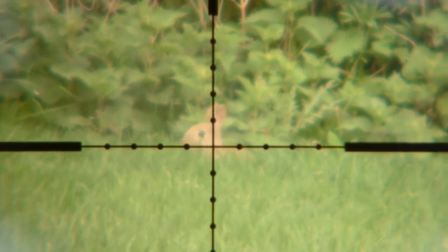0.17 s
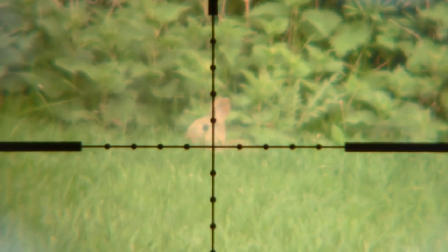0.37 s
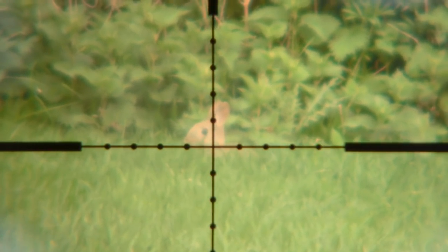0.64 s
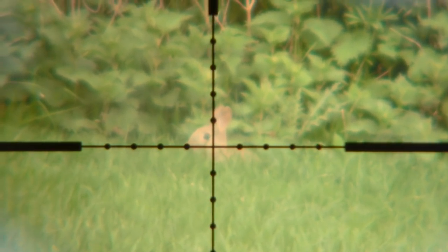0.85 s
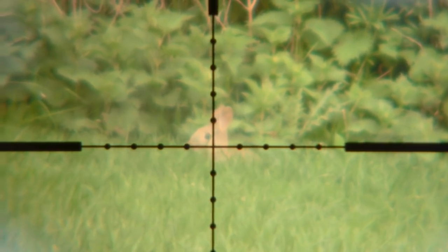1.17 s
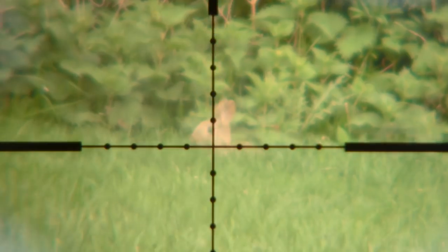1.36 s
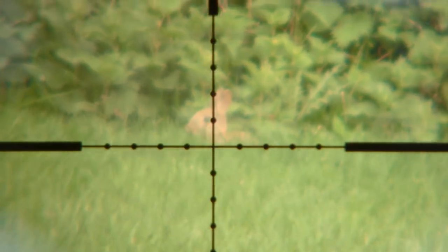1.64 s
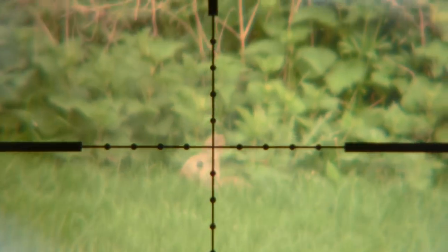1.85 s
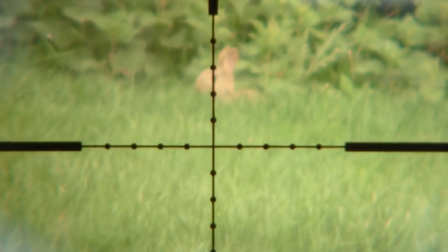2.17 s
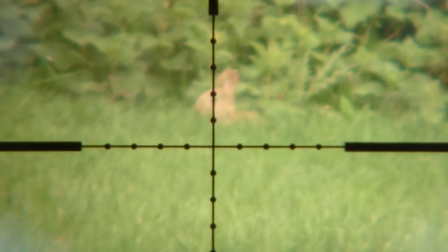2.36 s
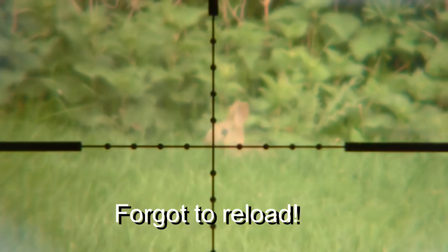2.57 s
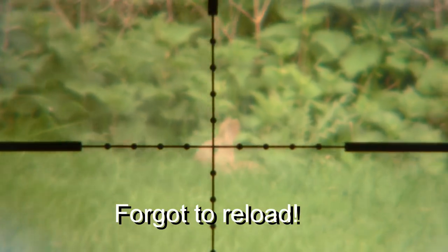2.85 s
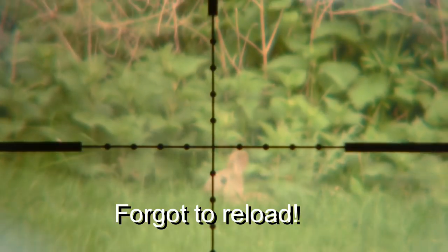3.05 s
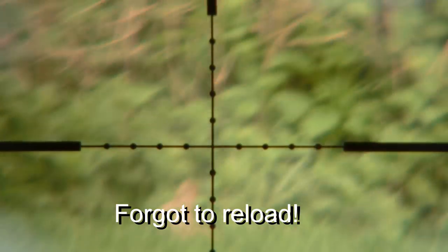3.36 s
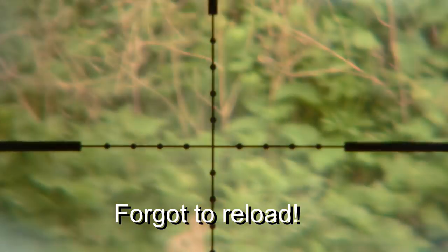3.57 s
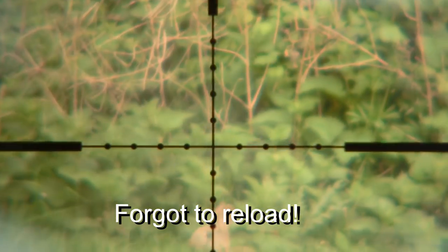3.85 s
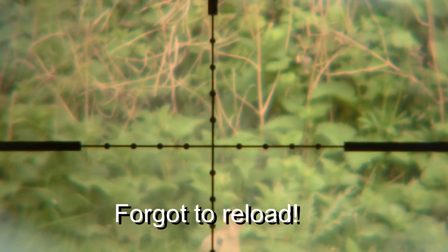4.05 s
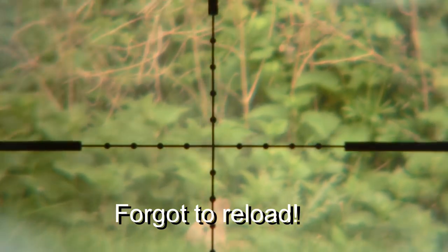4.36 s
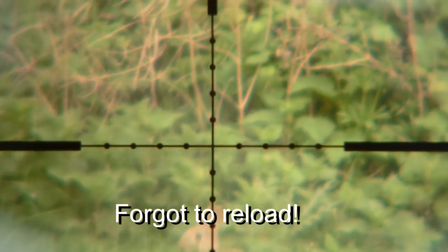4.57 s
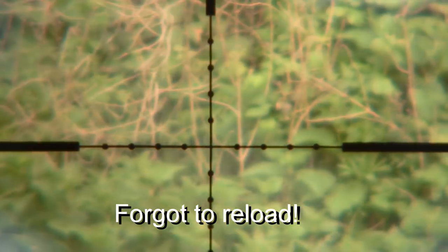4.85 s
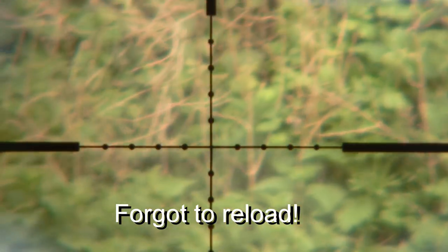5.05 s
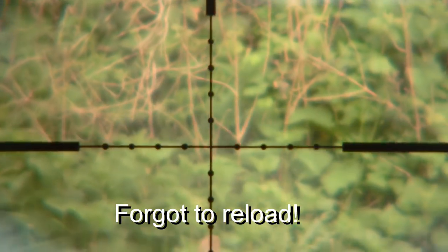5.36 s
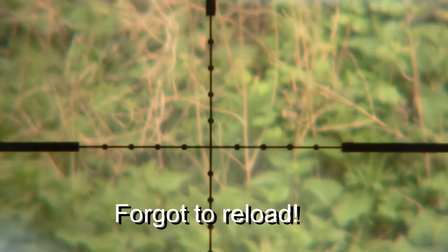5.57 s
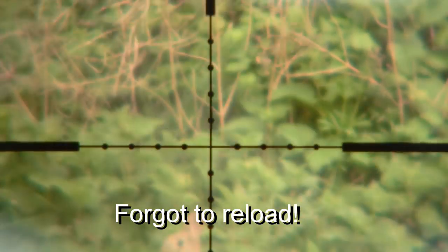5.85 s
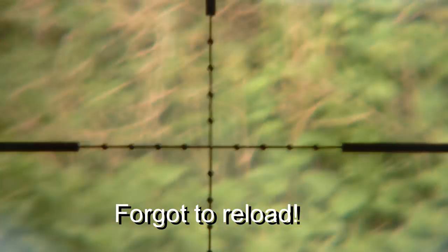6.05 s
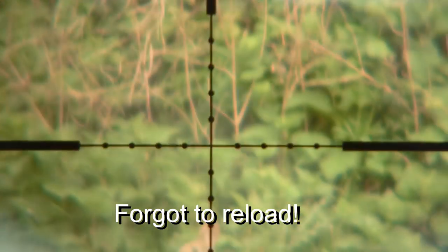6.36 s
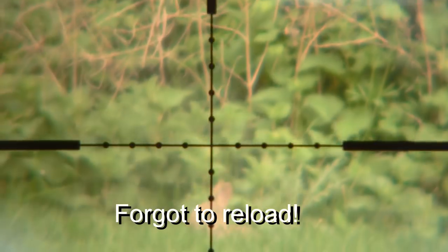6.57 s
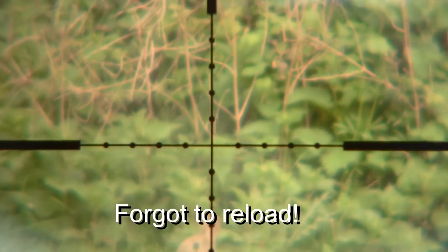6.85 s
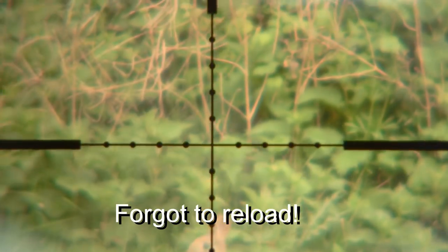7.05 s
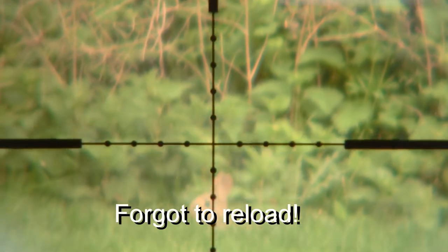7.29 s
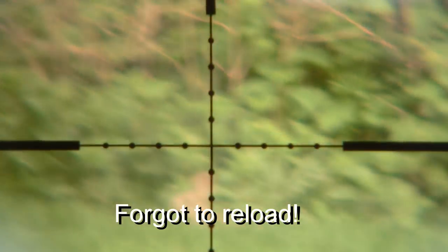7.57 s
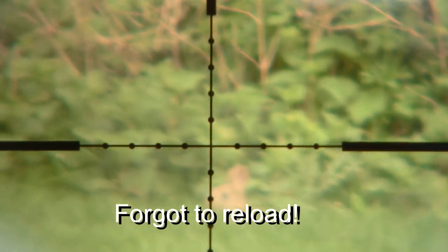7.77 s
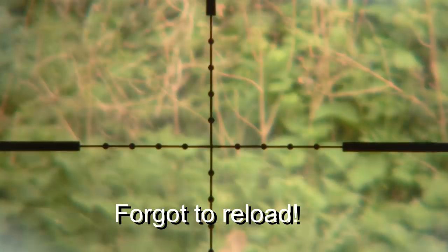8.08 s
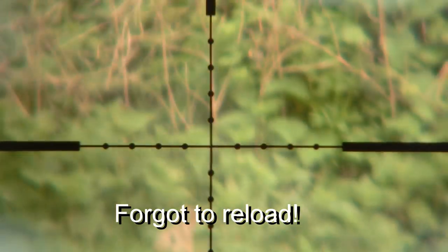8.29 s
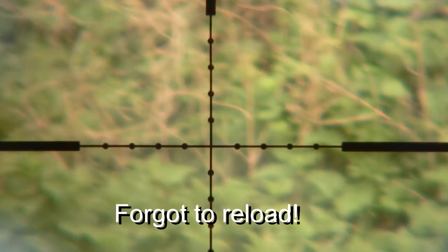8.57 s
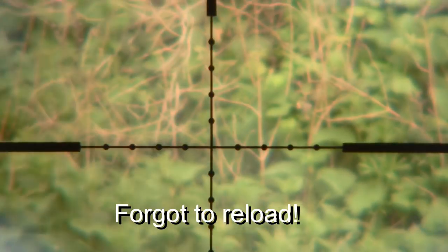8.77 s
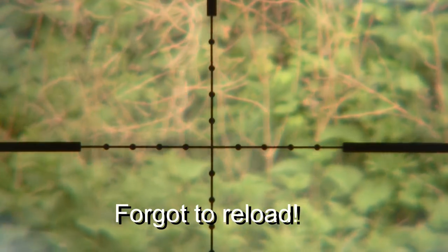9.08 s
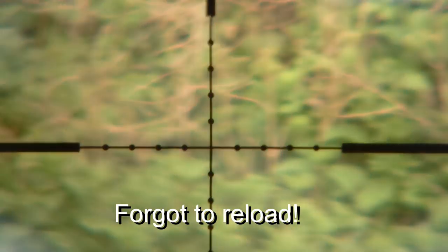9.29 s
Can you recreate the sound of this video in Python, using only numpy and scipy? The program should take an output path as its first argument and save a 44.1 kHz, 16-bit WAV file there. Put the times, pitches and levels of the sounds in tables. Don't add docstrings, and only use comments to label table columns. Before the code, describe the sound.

A microphone clamped to a rifle picks up close, hard metal sounds outdoors. Birds chirp and warble over faint traffic and hiss; light taps and a soft scrape lead to a solid clack, then a piercing snap, after which the background briefly dips. Clusters of clunks, scrapes, ticks and a tiny high spring ring follow, then rattling taps as a magazine is seated and a last double knock. Leaves return faint echoes of the birds.

```python
import sys
import numpy as np
from scipy import signal
from scipy.fft import rfft, irfft
from scipy.io import wavfile
from scipy.ndimage import uniform_filter1d

SR = 44100
rng = np.random.default_rng(int(sys.argv[2]) if len(sys.argv) > 2 else 0)


def wav_record(signal):
    frames = np.transpose(np.atleast_2d(signal))
    bounded = np.clip(frames, -1, 1)
    quanta = np.round(bounded * 32767).astype(np.int16)
    wavfile.write(sys.argv[1], SR, quanta)


def natural_amplitude(level_db):
    exponent = np.asarray(level_db, float) / 20
    return 10 ** exponent


N = 415422


def evened(x):
    return x / np.sqrt(np.mean(x ** 2) + 1e-20)


def read(points, hz):
    f, value = np.transpose(points)
    return np.interp(np.log(hz + 1), np.log(f + 1), value)


def add(mix, s, sound):
    part = mix[..., max(round(s * SR), 0):][..., :sound.shape[-1]]
    part += sound[..., :part.shape[-1]]


def noise(colour, same, patchy_db, size=1024):
    frames, hz = 4 * N // size + 5, np.fft.rfftfreq(size, 1 / SR)
    a, b, c, d, patches = rng.standard_normal((frames, len(hz), 5)).T
    patches = uniform_filter1d(patches, size=8, axis=0)
    patches = evened(uniform_filter1d(patches, size=12288 // size, axis=1))
    same = np.clip(same(hz), 0, 1)[:, None]
    left = a + 1j * b
    right = same * left + np.sqrt(1 - same ** 2) * (c + 1j * d)
    z = np.array([left, right]) * natural_amplitude(read(colour, hz)[:, None] + patchy_db * patches)
    return evened(signal.istft(z, nperseg=size, noverlap=3 * size // 4)[1][:, :N])


def road():
    # time in seconds, level in dB.
    roar_level = [(0.0, -58), (0.94, -55.5), (4.67, -56.5), (4.77, -54.5), (6.06, -56.5), (6.22, -52.5),
                  (7.26, -54.5), (8.58, -47.5), (9.42, -50.5)]
    # time in seconds, level in dB.
    rumble_level = [(0.0, -62), (1.05, -59.5), (4.67, -58), (5.17, -59.5), (5.61, -57), (6.85, -58),
                    (7.16, -59), (9.24, -59), (9.42, -56)]
    # frequency in Hz, density in dB per Hz.
    roar_colour = [(300, -23.5), (440, -9), (634, -0.5), (863, 2), (1180, -13.5), (1650, -25), (2600, -39),
                   (4000, -70)]
    rumble_colour = [(12, -26), (20, -8), (45, -4), (58, 1.5), (70, 5.5), (82, -6), (110, -8.5),
                     (265, -14.5), (420, -10), (600, -42)]
    # frequency in Hz, likeness from 0 to 1.
    far_likeness = [(60, 0.92), (130, 0.28), (290, 0.54), (640, 1), (1410, 0.96), (3100, 0.46)]

    def same(hz):
        return read(far_likeness, hz)

    t = np.arange(N) / SR
    roar_db = np.interp(t, *np.transpose(roar_level)) + 0.77
    roar = natural_amplitude(roar_db) * noise(roar_colour, same, 0.5)
    rumble_db = np.interp(t, *np.transpose(rumble_level)) + 2.0
    rumble = natural_amplitude(rumble_db) * noise(rumble_colour, same, 0.54, size=4096)
    return roar + rumble


def hiss():
    # frequency in Hz, density in dB per Hz.
    hiss_colour = [(300, 3.5), (1650, 2.5), (3620, -1.5), (5210, -3.5), (15500, -7.5)]
    return natural_amplitude(-61.5) * noise(hiss_colour, lambda hz: 300 / (hz + 300), 0.7)


def far_birds():
    # start in seconds, length in seconds, Hz at start, Hz at end,
    # level in dB.
    sweeps = [
        (0.25, 0.036, 4400, 6400, -71),
        (.385, 0.079, 4210, 4100, -63.5),
        (0.466, 0.04, 5370, 7200, -76),
        (2.648, 0.034, 4760, 5200, -61),
        (3.249, 0.043, 3500, 2940, -65),
        (4.106, 0.032, 2290, 5800, -59.5),
        (6.86, 0.022, 3630, 4500, -61.5),
        (9.408, 0.028, 4320, 4800, -51),
    ]
    # start in seconds, length in seconds, Hz at start, Hz at end, level in dB.
    whistles = [
        (1.02, .22, 2150, 2750, -65),
        (3.94, .32, 2370, 2250, -66),
        (5.335, .14, 2280, 2270, -60),
        (5.94, .1, 2350, 2450, -73),
        (6.41, .14, 2010, 1940, -72),
        (6.31, .18, 6030, 5970, -73),
        (6.78, .13, 5060, 5200, -68),
        (7.41, .1, 7140, 7140, -73),
    ]
    out = np.zeros(N)
    for s, length, start_hz, end_hz, db in whistles + sweeps:
        wobble = evened(uniform_filter1d(rng.standard_normal(16384), size=400))[:round(length * SR)]
        pitch = np.linspace(start_hz, end_hz, len(wobble)) + 25 * wobble
        level = natural_amplitude(db - 5 + 1.5 * wobble[::-1]) * signal.windows.tukey(len(pitch), .4)
        add(out, s, level * np.sin(2 * np.pi * np.cumsum(pitch) / SR))
    return out


def sparrows():
    # share of the call's length, pitch as share of its top, level in dB.
    zigzag = [(0, .82, -6), (.14, 1, 0), (.32, .74, -2), (.44, .66, -18), (.56, .64, -5), (.78, .8, 0),
              (.88, .68, -1), (1, .68, -6)]
    shoulder = [(0, .62, -2.5), (.17, 0.96, -0.5), (.26, .79, -1.5), (.42, .78, -1), (.47, .63, -8),
                (.62, 0.72, -4), (.8, .7, -11.5), (1, .59, -7)]
    stairs = [(0, .83, 3), (.15, 0.99, 1.5), (.4, 0.99, -7.5), (.46, .84, -1.5), (.64, 0.8, -15),
              (.7, .7, -8), (.8, .75, -2), (1, .64, -8)]
    # start in seconds, length in seconds, top pitch in Hz, level in dB.
    zigzag_calls = [(0.673, 0.078, 4920, -68), (1.733, 0.1, 4320, -65.5), (3.56, 0.115, 4450, -61.5),
                    (5.07, 0.105, 4400, -63.5), (6.383, 0.098, 4566, -62), (7.016, 0.065, 5320, -63.5)]
    shoulder_calls = [(.28, 0.12, 5350, -54.5), (.495, 0.11, 5350, -56.5), (1.514, 0.11, 5206, -51.5),
                      (2.69, 0.12, 5370, -59.5), (4.336, 0.11, 5240, -55.5)]
    stairs_calls = [(1.158, 0.094, 4500, -59.5), (1.903, 0.094, 4446, -61.5), (3.495, 0.072, 4500, -61),
                    (5.234, .095, 4520, -59), (8.965, 0.1, 4570, -60.5)]
    out = np.zeros(N)
    for shape, calls in [(zigzag, zigzag_calls), (shoulder, shoulder_calls), (stairs, stairs_calls)]:
        at, share, shape_db = np.transpose(shape)
        for s, length, top_hz, call_db in calls:
            u = np.linspace(0, 1, round(length * SR))
            chance = rng.standard_normal((3, 8192))
            wobble, rasp, flutter = (evened(uniform_filter1d(c, size=k))[:len(u)]
                                     for c, k in zip(chance, (120, 16, 400)))
            pitch = top_hz * (uniform_filter1d(np.interp(u, at, share), size=90) + 0.02 * wobble)
            level = natural_amplitude(call_db + np.interp(u, at, shape_db) + 3.5 * flutter)
            level = level * (1 + 0.45 * rasp) * signal.windows.tukey(len(u), .15)
            add(out, s, level * np.sin(2 * np.pi * np.cumsum(pitch) / SR))
    return out


def bounced(x):
    # delay in seconds, level in dB.
    bounces = [(.011, -12), (.023, -11), (.041, -13), (.067, -17)]
    out = x.copy()
    for s, db in bounces:
        add(out, s, natural_amplitude(db) * x)
    return natural_amplitude(-1.2) * out


def hedge(x):
    # frequency in Hz, time to fall 60 dB in seconds.
    decay = [(300, 0.56), (2000, 0.17), (4000, .36), (6000, 0.31), (12000, 0.064)]
    taps = np.zeros((2, 16000))
    at = np.arange(200, 15980, 20) + rng.integers(0, 20, (2, 789))
    np.put_along_axis(taps, at, rng.choice([-1., 1.], at.shape), 1)
    hz, t, z = signal.stft(taps, SR, nperseg=256)
    t60 = np.maximum(read(decay, hz), .02)[:, None]
    tail = signal.istft(z * natural_amplitude(-60 * t / t60), SR, nperseg=256)[1]
    return signal.fftconvolve(x[None], tail / np.linalg.norm(tail[0]), axes=1)[:, :N]


def ring(modes, drive, landing_db, chance):
    t = np.arange(4096) / SR
    hz, width, db = np.transpose(modes)[:, :, None]
    share = natural_amplitude(db + landing_db(hz[:, 0])[:, None]) * np.sign(chance[:len(hz), None])
    share = share / abs(np.exp(-2j * np.pi * hz * t[:len(drive)]) @ drive)[:, None] ** 0.9
    body = (share * np.exp(-np.pi * width * t) * np.cos(2 * np.pi * hz * t)).sum(0)
    out = signal.fftconvolve(drive, body)[:4096]
    return out / abs(out).max()


def crack(drive, lo_hz, hi_hz):
    band = signal.butter(2, [lo_hz, min(hi_hz, 20000)], "band", fs=SR, output="sos")
    out = signal.sosfilt(band, np.pad(drive, (0, 3072)))
    return out / abs(out).max()


def all_knocks():
    # start in seconds, stock peak in dB, action peak in dB, stock tone in Hz.
    taps = [(1.152, -34, -39.5, 730), (2.4415, -37, -39.5, 640), (2.457, -31, -38, 564),
            (2.47, -32, -46, 540), (3.4136, -41.5, -46.5, 650), (5.0908, -38.5, -38.5, 760),
            (5.726, -36.5, -37, 604), (5.8107, -37.5, -38, 496), (6.0566, -31.5, -32.5, 803),
            (6.0649, -24.5, -31.5, 586), (6.135, -36, -26, 580), (6.182, -35.5, -30.5, 560),
            (6.271, -35, -47, 573), (7.438, -40, -42.5, 670), (7.5824, -30, -42.5, 674),
            (7.6091, -23.5, -30.5, 778), (7.6939, -29, -28.5, 606), (7.9144, -25.5, -30.5, 643),
            (7.927, -31, -25.5, 704), (7.9943, -32, -34, 710), (8.021, -33.5, -38.5, 484),
            (8.2044, -32.5, -44, 647), (8.2577, -26.5, -32.5, 736), (8.273, -31, -33, 800),
            (8.327, -25, -33.5, 520), (8.423, -29.5, -31, 900), (8.431, -31.5, -38, 654),
            (8.4957, -28.5, -31.5, 580), (8.5539, -27.5, -30.5, 635), (8.766, -33.5, -43.5, 665)]
    # start in seconds, stock peak in dB, stock tone in Hz.
    thuds = [(1.264, -37.5, 393), (1.288, -35.5, 410), (1.29, -44, 387), (3.3645, -35, 544),
             (5.022, -38, 502), (5.1754, -27, 568), (6.346, -36.5, 657), (6.509, -33.5, 560),
             (7.466, -30, 618), (7.533, -35, 537), (7.794, -38, 527), (8.123, -36, 584), (8.349, -36, 770),
             (8.469, -24, 590), (8.477, -29, 665)]
    # start in seconds, action peak in dB, steel peak in dB.
    ticks = [
        (1.4447, -56, -40),
        (2.388, -46, -50),
        (3.555, -46, -46),
        (5.684, -59, -33),
        (5.713, -36, -39),
        (8.25, -44, -41),
        (8.376, -57, -48),
        (9.291, -35.5, -29),
        (9.326, -32, -52),
        (9.332, -45.5, -42),
    ]
    # start in seconds, then stock, action and steel peaks in dB, stock tone in Hz.
    blows = [(4.2994, -19, -20, -18, 760), (4.3025, -22, -18, -25, 603), (4.3047, -22.5, -22, -30, 600),
             (4.6875, -21, -18.5, -5, 765), (4.6904, -23.5, -7, 0.5, 623), (4.791, -23, -23, -34, 692),
             (6.0835, -18, -18, -16, 980), (6.1021, -34.5, -19.5, -19, 644), (6.109, -30, -23, -16, 606),
             (6.124, -23.5, -22.5, -27.5, 530), (6.15, -22, -37, -26.5, 570), (7.9345, -22, -13, -9, 620),
             (7.946, -44.5, -36, -20, 700), (8.418, -32.5, -30.5, -36, 730),
             (8.444, -38.5, -32.5, -24, 505), (9.282, -24, -22, -11, 646), (9.3092, -19, -13.5, -22.5, 680)]
    clunks = [
        (5.7407, -17, -14, -15, 604),
        (6.1426, -47, -21, -16, 650),
        (6.2256, -32, -28, -32.5, 616),
        (7.8944, -32, -29, -28.5, 670),
        (7.938, -25, -13, -18, 620),
        (7.943, -28, -44, -25.5, 620),
        (9.2795, -19, -15, -47, 680),
    ]
    rows = [row + (1.52,) for row in blows]
    rows += [row + (3.8,) for row in clunks]
    rows += [(s, stock, action, action - 12, hz, 1.48) for s, stock, action, hz in taps]
    rows += [(s, db, db - 21, db - 23, hz, 1.5) for s, db, hz in thuds]
    rows += [(s, action - 6, action, steel, 700, 1.6) for s, action, steel in ticks]
    return rows


def knocks():
    # frequency in Hz, width in Hz, level in dB.
    stock_modes = [(300, 110, -7.5), (393, 73, 7), (520, 136, 1), (642, 50, 0.5), (847, 147, -12.5),
                   (970, 500, 1.5), (1076.5, 100, -3.5)]
    action_modes = [(1531, 260, 4), (1644, 73, -9.5), (1943, 98, 0.5), (2174, 57, -10), (2700, 120, -8.5),
                    (3178, 99, -4.5), (3553, 66, -4.5), (4032, 450, -0.5), (4500, 330, 5.5)]
    steel_modes = [(5450, 310, 0.5), (6980, 370, -5.5), (7230, 820, -3), (8240, 1600, 5.5),
                   (10800, 830, -7), (11705, 680, -9), (12440, 710, -11), (14000, 1400, -12.5),
                   (14670, 600, -26)]
    out, t = np.zeros(N), np.arange(1024) / SR
    steep = signal.butter(3, [240, 1700], "band", fs=SR, output="sos")
    muffle = signal.butter(3, 6000, fs=SR, output="sos")
    for s, stock_db, action_db, steel_db, stock_hz, chatter_ms in all_knocks():
        chance = rng.standard_normal(30)
        grit, shove = rng.standard_normal((2, 1024))
        u = t * 1000 / max(chatter_ms, .2)
        drive = grit * abs(grit) * (1 - np.exp(-u * 6)) * np.exp(-u ** 0.83)
        push = shove * (u / 1.2) * np.exp(-u / 1.25)
        snap = drive * np.exp(-.8 * u)
        dull = np.clip(steel_db - action_db, -25, 8)
        stock_hz = stock_hz * (1 + .035 * max(stock_db + 17, 0))

        def on_stock(hz):
            octaves = np.log2(hz / stock_hz)
            return -6. * octaves ** 2 - 12.0 * np.minimum(octaves, 0) ** 2

        def on_action(hz):
            return 0.58 * dull * np.log2(hz / 2000) + 2. * chance[-len(hz):]

        def on_steel(hz):
            return 0.89 * dull * np.log2(hz / 5000) + 2. * chance[10:10 + len(hz)]

        wood = ring(stock_modes, push, on_stock, chance)
        action = ring(action_modes, drive, on_action, chance) + 0.88 * crack(drive, 900, 3600)
        steel = ring(steel_modes, snap, on_steel, chance) + 0.5 * crack(snap, 3400, 11500 + 250 * dull)
        sound = natural_amplitude(stock_db) * signal.sosfilt(steep, wood)
        sound = sound + natural_amplitude(action_db - 2.0) * signal.sosfilt(muffle, action)
        add(out, s, sound + natural_amplitude(steel_db - 3.5) * steel)
    return out


def jolts():
    # start in seconds, peak in dB, frequency in Hz.
    thumps = [(1.27, -41.5, 200), (2.46, -41, 169), (4.69, -35.5, 132), (5.74, -36, 159), (5.75, -40, 64),
              (6.099, -36, 70), (6.224, -41.5, 137), (7.937, -27.5, 140), (9.282, -29, 226),
              (9.29, -33.5, 69), (6.532, -45, 300), (6.1, -35, 32), (6.62, -44, 30), (1.3, -50, 32)]
    out, t = np.zeros(N), np.arange(4096) / SR
    for s, db, hz in thumps:
        swell = 2.9 * (t * hz / 0.75) * np.exp(-t * hz / 0.62)
        add(out, s, natural_amplitude(db) * np.sin(2 * np.pi * hz * t) * swell)
    return out


def slides():
    # start in seconds, length in seconds, rms level in
    # dB.
    strokes = [(1.363, 0.4, -53.5), (4.639, 0.12, -52.5), (4.679, 0.065, -44.5), (5.657, 0.099, -53.5),
               (5.745, 0.075, -54), (6.051, 0.074, -39), (6.089, 0.082, -37), (6.191, .05, -44),
               (7.585, 0.061, -45.5), (7.905, 0.018, -39), (7.94, 0.047, -62.5), (8.261, 0.064, -46.5),
               (8.404, 0.12, -45), (9.275, 0.042, -54.5)]
    # frequency in Hz, density in dB per Hz.
    scrape_colour = [(200, 5.5), (600, 9), (2000, -9), (5000, -13.5), (10000, -22.5), (16000, -29)]
    level = np.zeros(N)
    for s, length, db in strokes:
        u = np.linspace(0, 1, round(length * SR))
        add(level, s, natural_amplitude(db - 5.9 * u) * signal.windows.tukey(len(u), .3))
    rough = evened(uniform_filter1d(rng.standard_normal(N), size=90))
    grit = natural_amplitude(3.3 * np.minimum(level / natural_amplitude(-56.5), 1) * rough)
    return level * evened(grit * noise(scrape_colour, np.ones_like, 3.)[0])


def rings():
    # start in seconds, frequency in Hz, width in Hz, level in dB.
    picked_modes = [(2.457, 610, 80, -52), (2.457, 1970, 180, -35), (4.3, 560, 48, -6),
                    (4.3, 1052, 52, -13), (4.313, 3300, 200, -29), (4.314, 4400, 250, -30),
                    (4.302, 1445, 34, -19.5), (4.302, 1904, 47, -22), (4.302, 3240, 47, -27.5),
                    (4.302, 4390, 90, -29.5), (4.31, 658, 9, -35), (4.303, 388, 12, -39),
                    (4.303, 790, 120, -17), (4.304, 2500, 200, -27), (4.692, 605, 65, -16),
                    (4.6913, 1560, 150, -15), (4.69, 1870, 36, -27.5), (4.6905, 3720, 100, -25.5),
                    (4.6905, 4095, 160, -17), (4.692, 376.4, 50, -19.5), (4.691, 837, 46, -28),
                    (4.6907, 8750, 380, -8), (5.741, 1550, 61, -19.5), (5.74, 2900, 79, -21),
                    (5.742, 945, 29, -26), (5.742, 1060, 34, -28), (5.741, 4960, 140, -27),
                    (5.743, 641, 40, -17), (6.227, 2010, 160, -20.5), (6.228, 3170, 400, -20),
                    (6.226, 1513, 100, -28), (6.226, 480, 120, -18), (6.508, 540, 53, -38),
                    (6.56, 480, 70, -38), (7.61, 1610, 81, -34), (7.936, 1955, 50, -18),
                    (7.934, 2760, 51, -25), (7.936, 640, 40, -24), (7.933, 3370, 120, -20),
                    (7.934, 255, 45, -23.5), (7.9345, 4550, 300, -14), (7.9345, 5950, 350, -13),
                    (8.328, 300, 71, -33), (9.281, 645, 55, -14), (9.28, 1340, 150, -18),
                    (9.28, 1890, 110, -13), (9.284, 3170, 230, -17), (9.281, 1085, 95, -29),
                    (9.282, 6560, 500, -19), (9.31, 1600, 350, -12), (9.311, 3250, 54, -37),
                    (9.3103, 7100, 500, -21)]
    grip = 1.6
    out, t = np.zeros(N), np.arange(8192) / SR
    for s, hz, width, db in picked_modes:
        u = np.pi * 1.3 * width * t
        swell = u * np.exp((1 - u ** grip) / grip)
        add(out, s, natural_amplitude(db - 4.5) * swell * np.sin(2 * np.pi * hz * t))
    return out


def spring():
    # frequency in Hz, width in Hz, level in dB.
    spring_modes = [(11700, 60, -9), (12110, 20, 2), (12166, 20, 0), (12290, 55, 0)]
    # start in seconds, peak in dB.
    hits = [
        (6.109, -33),
        (6.1445, -22),
    ]
    out = np.zeros(N)
    for s, db in hits:
        add(out, s, natural_amplitude(db) * ring(spring_modes, np.ones(1), np.zeros_like, np.ones(len(spring_modes))))
    return out


def ports(x):
    # frequency in Hz, side level against mid in dB.
    near_side = [(110, -15.5), (380, -12), (700, -19), (1290, -18), (2380, -1.5), (4400, -12), (8120, -7),
                 (15000, 0)]
    hz = np.fft.rfftfreq(N, 1 / SR)
    side = irfft(rfft(x) * np.exp(1.45j) * natural_amplitude(read(near_side, hz)), N)
    return x + np.array([side, -side])


def scene():
    gun = knocks() + jolts() + slides() + rings() + spring()
    song = bounced(far_birds() + sparrows())
    echoes = hedge(natural_amplitude(-25.5) * gun + natural_amplitude(-0.5) * song)
    return ports(gun) + natural_amplitude(5) * song + echoes + road() + hiss()


def top_cut(x):
    return signal.sosfilt(signal.butter(12, 17000, fs=SR, output="sos"), x)


def record(dry):
    peak_s = abs(np.diff(dry.mean(0))).argmax() / SR
    since = np.arange(N) / SR - peak_s
    dip_db = 4.1 * np.clip((since - .05) / 0.042, 0, 1) * np.clip((1.05 - since) / 0.24, 0, 1)
    hz = np.fft.rfftfreq(N, 1 / SR)
    notch_db = -5. * np.exp(-((hz - 12550) / 90) ** 2)
    edge_db = -.06 * np.maximum(hz - 15560, 0)
    held = np.clip(dry, -.93, .93) * natural_amplitude(-dip_db)
    return top_cut(irfft(rfft(held) * natural_amplitude(notch_db + edge_db), N))


dry = scene()
out = record(dry)
wav_record(out)
```